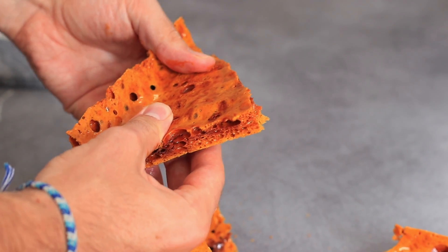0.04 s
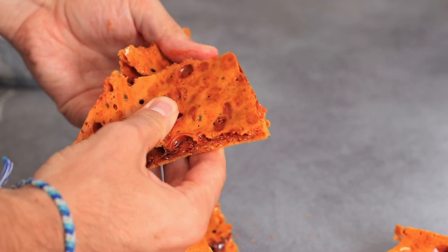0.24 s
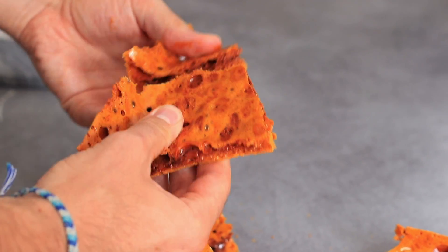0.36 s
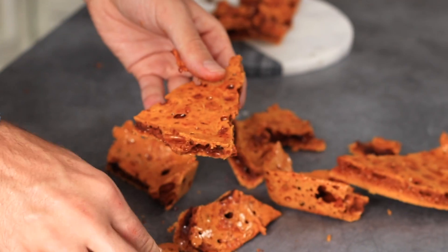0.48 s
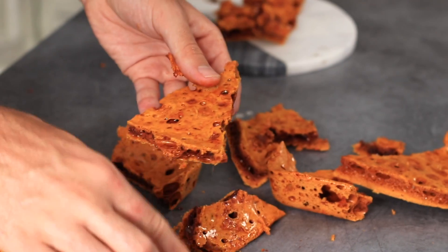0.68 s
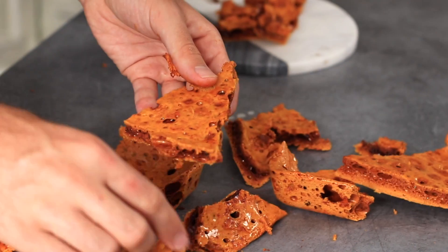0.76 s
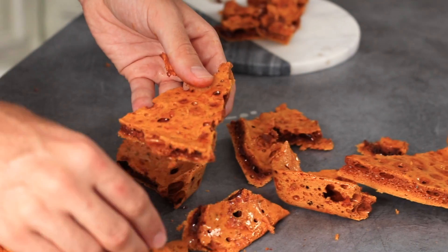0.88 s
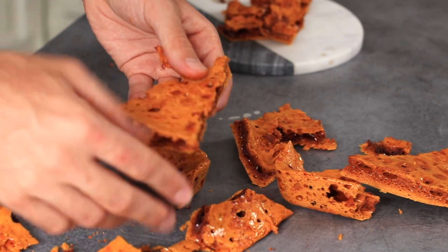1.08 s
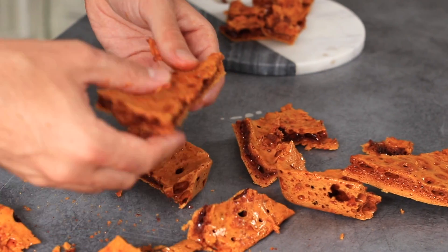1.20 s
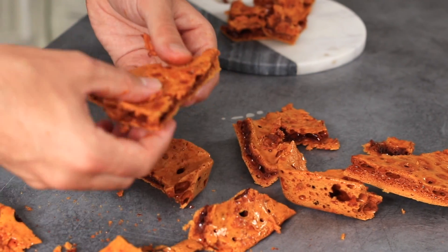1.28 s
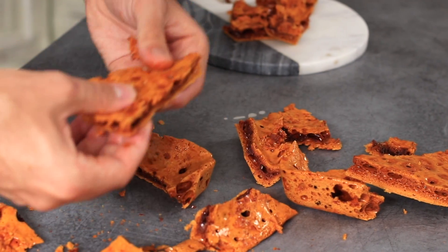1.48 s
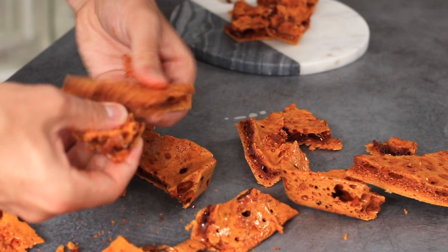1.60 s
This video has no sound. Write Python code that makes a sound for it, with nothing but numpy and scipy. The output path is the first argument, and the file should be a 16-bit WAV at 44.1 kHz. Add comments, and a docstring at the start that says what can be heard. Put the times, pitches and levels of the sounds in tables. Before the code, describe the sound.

A slab of brittle toffee snaps with one sharp crack, close up in a quiet kitchen. A dull thud follows further off, then crumbs tick, a piece knocks on the worktop and broken edges briefly grind together.

```python
"""Faint warning cracks sound over a low ventilation hum as two hands bend a slab of brittle toffee.
The slab snaps, close by in a quiet kitchen: the fracture excites its short-lived modes and throws splinters.
A dull thud follows further off, crumbs tick, and a nudged piece knocks on the worktop.
Fingers slide over the sugar with a grainy friction noise, and at the end two broken edges
grind together in stick-slip motion, exciting the resonances of the piece in the hand."""
import sys
import numpy as np
from scipy import signal
from scipy.fft import rfft, irfft, next_fast_len
from scipy.io import wavfile
from scipy.ndimage import uniform_filter1d

SR = 44100
rng = np.random.default_rng(int(sys.argv[2]) if len(sys.argv) > 2 else 0)


def to_wav(sig):
    """Store sig (one row per channel, or 1-D mono) as 16-bit WAV at the path in sys.argv[1].

    Samples outside -1..1 are clipped; the rate is SR.
    """
    pcm = np.clip(np.atleast_2d(sig), -1, 1) * 32767
    pcm = np.round(pcm).astype(np.int16)
    wavfile.write(sys.argv[1], SR, pcm.T)  # frames by channels


N = 72765
TIME = np.arange(N) / SR

# air noise spectra, common to both ears and differing between them: (frequency [Hz], gain [dB])
AIR_COLOUR = [(25, -13), (70, -4.5), (150, -4), (280, -4), (620, -6), (1000, -14), (2300, -19.5),
              (5700, -21.5), (11000, -23), (16000, -23.5)]
SIDE_AIR_COLOUR = [(25, -12), (70, -8), (150, -11), (600, -12), (1500, -20), (16000, -25)]
# fan tones: (frequency [Hz], level [dB])
FAN_TONES = [(200.6, -59.5), (300, -70.5), (426, -67), (621, -69)]
# reverberation time of the kitchen: (frequency [Hz], T60 [s])
ROOM_T60 = [(200, 0.5), (1400, 0.52), (4000, 0.58), (9000, 0.41), (15000, 0.38)]
# spectrum of the reverberation: (frequency [Hz], gain [dB])
ROOM_COLOUR = [(100, 3), (700, -3), (1600, -1.5), (8000, 3), (16000, -0.5)]

# friction envelopes of fingers on sugar and of edge on edge: (time [s], level [dB])
FINGER_RUB = [(0, -65), (.09, -83), (.13, -56), (.45, -66), (.52, -48.5), (.6, -68), (.7, -74),
              (.75, -52.5), (.78, -67), (.87, -58), (.95, -57), (1.01, -49), (1.06, -66), (1.18, -53),
              (1.4, -53.5), (1.6, -61)]
EDGE_SCRAPE = [(1.405, -68), (1.43, -46), (1.442, -44), (1.474, -45), (1.485, -41), (1.51, -39),
               (1.54, -60), (1.6, -67)]
# sudden slips of the broken edges: (time [s], level [dB])
EDGE_SLIPS = [(1.4128, -36.5), (1.4208, -51), (1.4326, -23), (1.4383, -27), (1.4428, -31), (1.4465, -24),
              (1.4497, -24.5), (1.4536, -35), (1.457, -27), (1.4802, -26), (1.484, -32), (1.4877, -28),
              (1.4946, -22.5), (1.497, -28), (1.5027, -38), (1.5078, -26), (1.5156, -26.5), (1.5203, -39),
              (1.529, -41), (1.5412, -31), (1.5747, -22), (1.605, -31), (1.6163, -33.5), (1.6312, -36.5),
              (1.6493, -16.5)]
# friction spectra of the fingers and of the edges: (frequency [Hz], gain [dB])
FINGER_COLOUR = [(300, -14), (1500, -6.5), (2300, 2.5), (3200, -7.5), (7000, -5), (10000, -0.5), (12800, 0),
                 (16000, -8)]
EDGE_COLOUR = [(400, -14), (1600, -18), (2300, -10), (4500, -9), (7000, -2), (10200, 0.5), (11300, -2),
               (13000, 2), (16000, -6)]
# resonances of the broken piece: (frequency [Hz], bandwidth [Hz], gain [dB])
PIECE_RESONANCES = [(2204, 250, 9), (3610, 300, 6), (6420, 350, -7), (8050, 350, -8), (10340, 500, -7)]

# knocks of a piece, bumps of the hand, and the thud from first touch to full weight: (time [s], level [dB])
KNOCKS = [(.8503, -12.5), (.8555, -21), (.862, -18), (.870, -24), (.9152, -20), (.9235, -23), (.9405, -19),
          (.9862, -15), (1.052, -25)]
HAND_BUMPS = [(.9865, -16), (1.256, -18)]
THUD_CONTACTS = [(.4745, -32), (.4805, -14), (.4848, -5.5)]
# spectra of these three impacts: (frequency [Hz], gain [dB])
KNOCK_COLOUR = [(100, -13), (350, -1.5), (560, 0.5), (730, 3.5), (950, -5.5), (1200, -1.5), (1750, -12),
                (2900, -14), (4500, -31.5), (16000, -28)]
HAND_COLOUR = [(25, -24), (80, -3), (280, 0.5), (500, -17), (1500, -21), (16000, -74)]
THUD_COLOUR = [(40, -19), (130, -14), (240, 2), (500, -1), (700, -4), (1000, -7), (1400, 1), (2100, -6),
               (2650, -10), (3200, -18.5), (6000, -16.5), (16000, -45)]
# modes excited by the thud: (frequency [Hz], level [dB], T60 [s])
THUD_MODES = [(238.5, -36, .3), (372, -43, .3), (453, -42, .28), (519, -39, .3), (1398, -49, .3),
              (1586, -49, .25), (1880, -51, .25), (2094, -50, .3)]

# ticking crumbs, the small ones thinner: (time [s], level [dB], low edge [Hz])
CRUMB_TICKS = [(0.365, -31.5, 8200), (.409, -38.5, 6000), (.5177, -34.5, 7000), (0.5225, -33, 7000),
               (0.533, -40, 6000), (0.544, -36.5, 6000), (0.6465, -37.5, 8000), (0.6511, -35.5, 7060),
               (.7080, -34, 7000), (.7933, -33.5, 7000), (0.796, -35, 5000), (0.8115, -31.5, 1500),
               (.833, -36, 8000), (0.848, -25, 2010), (.861, -34, 1500), (0.879, -37.5, 6000),
               (0.9378, -35, 2500), (.9633, -44, 3970), (0.9815, -28, 2480), (0.9841, -25, 2500),
               (1.0012, -24.5, 4400), (1.006, -38, 8000), (1.2727, -38.5, 4000)]
# warning cracks in the bent slab: (time [s], level [dB])
WARNING_CRACKS = [(.0052, -34), (.1076, -25), (.1103, -18.5), (.1138, -34), (.1585, -41), (.1667, -34)]
# the slab breaks, then its last bridge gives: (time [s], level [dB])
BREAKS = [(0.1685, -1), (0.1722, -14.5)]
# spectra of crumbs, cracks and the snap as it radiates to the walls: (frequency [Hz], gain [dB])
CRUMB_COLOUR = [(300, -28), (1500, -19), (2800, 1), (3900, -8), (5300, -0.5), (7500, -2.5), (9500, -1.5),
                (12200, 0), (16000, -3)]
CRACK_COLOUR = [(300, -37), (1400, -16), (2400, -7), (3500, 3), (4800, 0), (7400, 2.5), (8600, -3.5),
                (11000, -1), (14300, 1.5), (16000, -5.5)]
RADIATED_COLOUR = [(200, -17), (750, -17), (1200, 0.5), (2500, -1), (5000, -1), (7500, 2), (11000, -1),
                   (16000, -7.5)]
# modes of the slab: (frequency [Hz], level [dB], T60 [s])
SLAB_MODES = [(275, -28.5, 0.013), (1164, -17, 0.0083), (2900, -11.5, 0.011), (3500, -11, 0.0075),
              (4440, -12, 0.011), (5520, -9, .011), (6140, -2.5, 0.0057), (6960, -0.5, 0.0064),
              (8020, -14.5, .011), (9800, -4.5, .007), (11660, -8, 0.006), (12960, -4, 0.0063),
              (15000, -9.5, 0.0056)]


def from_db(db):
    """Amplitude grows tenfold for every 20 dB."""
    return 10 ** (np.asarray(db) / 20)


def unit_rms(x):
    """Dividing by the RMS amplitude gives unit mean power."""
    return x / np.sqrt(np.mean(x ** 2) + 1e-20)


def at_hz(points, hz):
    """Interpolation on a logarithmic frequency axis."""
    frequencies, values = np.transpose(points)
    return np.interp(np.log(np.maximum(hz, 1)), np.log(frequencies), values)


def coloured(x, colour):
    """Minimum-phase filtering imposes a spectrum causally, with unit power gain."""
    size = 2 * next_fast_len(N)
    gain = unit_rms(from_db(at_hz(colour, np.linspace(0, SR / 2, size // 2 + 1))))
    cepstrum = irfft(np.log(gain))[:size // 2]
    cepstrum[1:] *= 2
    return irfft(rfft(x, size) * np.exp(rfft(cepstrum, size)))[:N]


def resonance(x, hz, width_hz):
    """Forced response of a two-pole resonator with unit peak gain."""
    radius = np.exp(-np.pi * width_hz / SR)
    feedback = [1, -2 * radius * np.cos(2 * np.pi * hz / SR), radius ** 2]
    return signal.lfilter(np.array([1, 0, -1]) * (1 - radius ** 2) / 2, feedback, x + 1e-18)


def ring(start_s, hz, t60):
    """Free vibration of a damped mode: a unit sinusoid that falls 60 dB in t60 seconds."""
    age = np.maximum(TIME - start_s, 0)
    return np.sin(2 * np.pi * hz * age) * np.exp(-np.minimum(np.log(1000) * age / t60, 40))


def impulses(events):
    """A very brief force acts as an impulse, one for each event."""
    force = np.zeros(N)
    for time_s, db in events:
        force[int(time_s * SR)] += from_db(db)
    return force


def bursts(events, decay_s, rise_s=0.00028):
    """Showers of tiny contacts or fractures are incoherent, so their powers add."""
    power = np.zeros(N)
    envelope = (1 - np.exp(-TIME / rise_s)) * np.exp(-np.minimum(TIME / decay_s, 30))
    for time_s, db in events:
        start = int(time_s * SR)
        power[start:] += (from_db(db) * envelope[:N - start] / envelope.max()) ** 2
    return from_db(-1.5) * np.sqrt(power) * rng.choice([-1, 1], N)


def friction(level_curve, spread_db, grain_s=0.0014):
    """Surface roughness modulates sliding noise from grain to grain."""
    roughness = unit_rms(uniform_filter1d(rng.standard_normal(N), size=int(grain_s * SR)))
    envelope = from_db(np.interp(TIME, *np.transpose(level_curve), left=-120))
    return envelope * unit_rms(from_db(spread_db * roughness) * rng.standard_normal(N))


def ventilation(waver_rad=0.39):
    """Moving air gives broadband noise; random phase modulation makes the fan tones waver."""
    sound = from_db(-53.5) * coloured(rng.standard_normal(N), AIR_COLOUR)
    for hz, db in FAN_TONES:
        waver = waver_rad * unit_rms(resonance(rng.standard_normal(N), hz=4.6, width_hz=7.1))
        sound += from_db(db) * np.sqrt(2) * np.sin(2 * np.pi * hz * TIME + waver)
    return sound


def kitchen(x, build_s=0.01):
    """Reverberation: a diffuse field builds up, then decays exponentially at each band's own rate."""
    tail = np.zeros(N)
    edges_hz = np.geomspace(80, 18000, 13)
    for low, high in zip(edges_hz, edges_hz[1:]):
        bandpass = signal.butter(2, [low, high], "band", fs=SR, output="sos")
        decay = np.exp(-np.log(1000) * TIME / at_hz(ROOM_T60, np.sqrt(low * high)))
        tail += decay * signal.sosfilt(bandpass, rng.standard_normal(N))
    tail = coloured(tail * (1 - np.exp(-TIME / build_s)), ROOM_COLOUR)
    return signal.fftconvolve(x, unit_rms(tail) / np.sqrt(N))[:N]


def fingers():
    """Sliding friction of skin on grainy sugar gives a faint hiss."""
    return coloured(friction(FINGER_RUB, spread_db=2), FINGER_COLOUR)


def crumbs():
    """Small bodies radiate low frequencies poorly, so each crumb's tick is a high-passed burst."""
    ticks = np.zeros(N)
    for time_s, db, low_hz in CRUMB_TICKS:
        highpass = signal.butter(2, low_hz, "high", fs=SR, output="sos")
        ticks += signal.sosfilt(highpass, bursts([(time_s, db)], decay_s=0.0013) + 1e-18)
    return coloured(ticks, CRUMB_COLOUR)


def hand_bumps():
    """Soft contact confines the hand's impacts to low frequencies."""
    return coloured(impulses(HAND_BUMPS), HAND_COLOUR)


def worktop_knocks():
    """A piece rocks on the worktop in repeated impacts, each an impulse with brief contact noise."""
    force = impulses(KNOCKS) + from_db(-20.5) * bursts(KNOCKS, decay_s=0.0037)
    return from_db(-1.5) * coloured(force, KNOCK_COLOUR)


def thud(softness_hz=3070):
    """Soft contact low-passes a blow further off; its full weight excites hollow-sounding modes."""
    settling = from_db(-22.5) * bursts(THUD_CONTACTS, decay_s=0.0081)
    lowpass = signal.butter(1, softness_hz, fs=SR, output="sos")
    force = signal.sosfilt(lowpass, impulses(THUD_CONTACTS) + settling)
    blow = from_db(-1.5) * coloured(force, THUD_COLOUR)
    full_weight_s = THUD_CONTACTS[-1][0]
    hollow = sum(from_db(db) * ring(full_weight_s, hz, t60) for hz, db, t60 in THUD_MODES)
    return blow, hollow


def grinding_edges():
    """Stick-slip friction between the broken edges drives the resonances of the piece in the hand."""
    slips = bursts(EDGE_SLIPS, decay_s=0.0013)
    scrape = from_db(1) * friction(EDGE_SCRAPE, spread_db=3)
    contact = coloured(slips + scrape, EDGE_COLOUR)
    ringing = sum(from_db(db) * resonance(contact, hz, width) for hz, width, db in PIECE_RESONANCES)
    return from_db(-3.5) * contact + ringing


def warning_cracks():
    """Acoustic emission: small fractures in the bent slab release strain energy as clicks."""
    return coloured(bursts(WARNING_CRACKS, decay_s=0.00064), CRACK_COLOUR)


def snap(crossing_s=0.000087):
    """Brittle fracture: a crack crosses the slab, exciting its modes; splinters fly, the hands recoil."""
    ringing = np.zeros(N)
    for break_s, break_db in BREAKS:
        for k, (hz, db, t60) in enumerate(SLAB_MODES):
            polarity = (-1) ** (k // 2)
            onset_s = break_s + crossing_s * k / len(SLAB_MODES)
            ringing += polarity * from_db(break_db + db) * ring(onset_s, hz, t60)
    splinters = from_db(-15) * coloured(bursts(BREAKS, decay_s=0.00097), CRACK_COLOUR)
    recoil = from_db(-14.5) * coloured(impulses(BREAKS), HAND_COLOUR)
    return ringing + splinters + recoil


def scene():
    """Direct and reverberant sound superpose in the centre; further sources carry more reverberation."""
    crackles = warning_cracks() + crumbs()
    grind = grinding_edges()
    blow, hollow = thud()
    knocks = worktop_knocks()
    radiated_snap = from_db(-2) * coloured(impulses(BREAKS[:1]), RADIATED_COLOUR)
    near_to_walls = radiated_snap + from_db(-14) * crackles + from_db(-12.5) * grind
    room = kitchen(near_to_walls + from_db(-2) * knocks + from_db(2.5) * blow)
    direct = snap() + crackles + grind + knocks + hand_bumps() + blow + hollow + fingers()
    mid = direct + room + ventilation()
    side = from_db(-73.5) * coloured(rng.standard_normal(N), SIDE_AIR_COLOUR)
    return np.array([mid + side, mid - side])


def record(dry):
    """Soft saturation rounds the peak of the snap; a steep low-pass removes the highest treble."""
    ceiling, cutoff_hz = 1.3, 15700
    rounded = ceiling * np.tanh(dry / ceiling)
    return signal.sosfilt(signal.butter(24, cutoff_hz, fs=SR, output="sos"), rounded)


dry = scene()
out = record(dry)
to_wav(out)
```